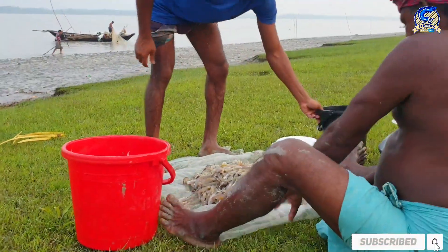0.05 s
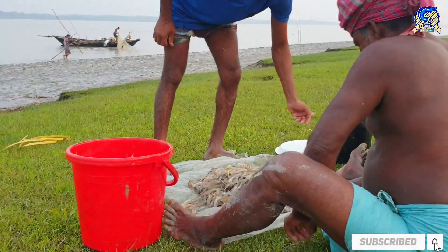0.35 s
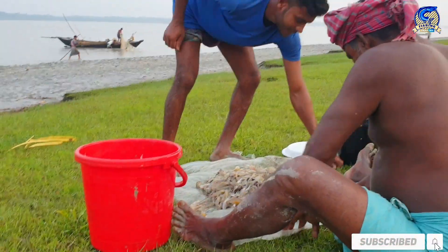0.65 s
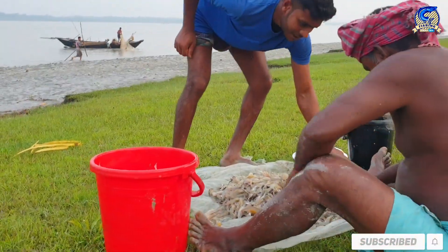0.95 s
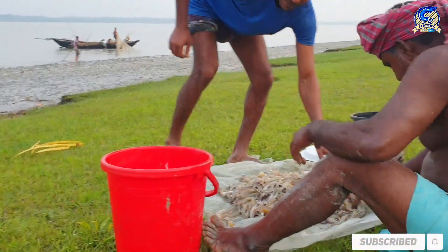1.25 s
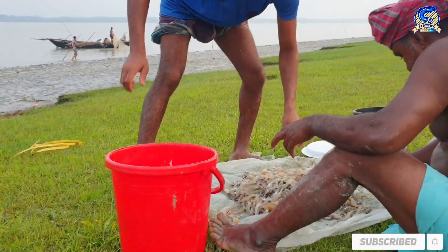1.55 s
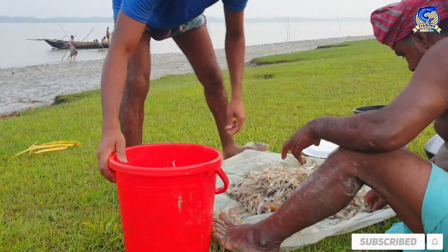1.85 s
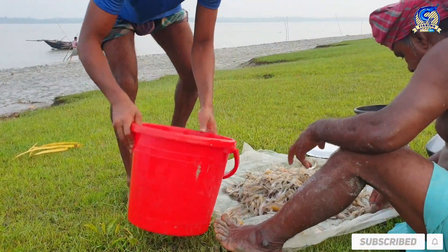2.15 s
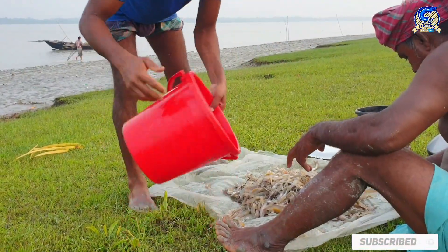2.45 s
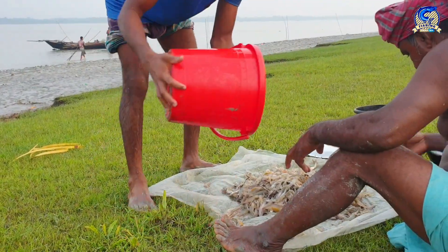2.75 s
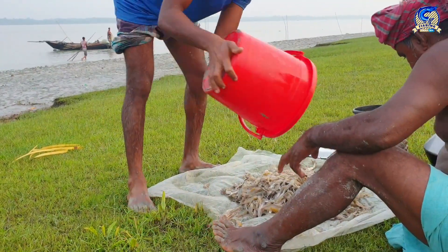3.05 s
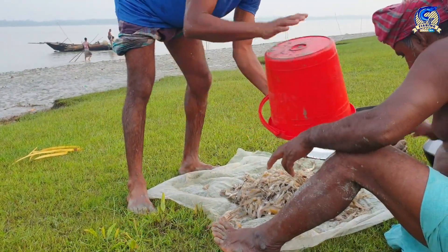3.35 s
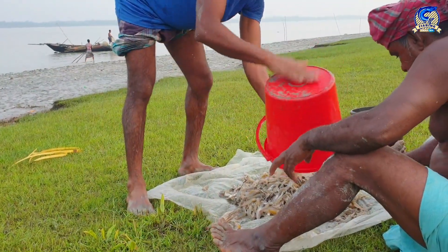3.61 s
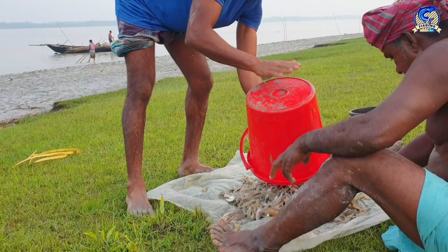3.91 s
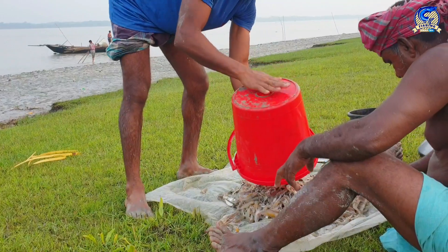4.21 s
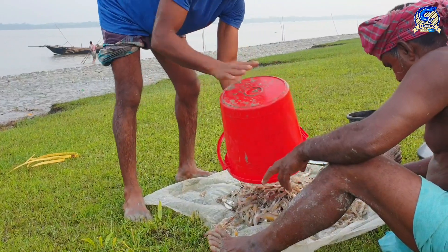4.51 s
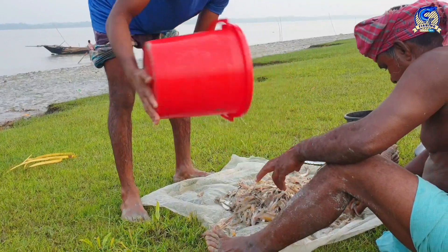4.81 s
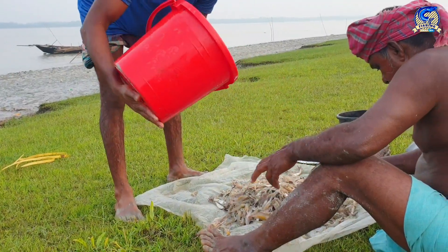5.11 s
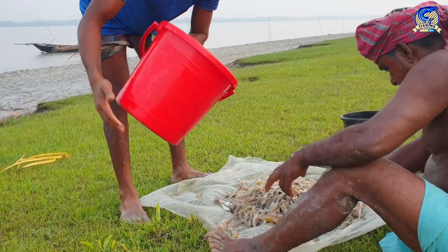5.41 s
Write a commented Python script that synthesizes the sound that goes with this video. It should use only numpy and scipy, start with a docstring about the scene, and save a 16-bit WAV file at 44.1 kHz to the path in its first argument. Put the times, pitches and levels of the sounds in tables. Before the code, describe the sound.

Outdoors, over light wind rumble and a thin hiss, fingers scrape, tap and bump the microphone, mostly on the right. A plastic bucket then knocks softly as it is turned over. A hand slaps its bottom six times in quick succession, each slap a hollow boom with a rattle of the loose handle. A few light knocks follow as the grip shifts.

```python
"""On a grassy riverbank, over light gusts of wind and a thin hiss, fingers rub, tap and bump the camera
near its right microphone. Then a plastic bucket is lifted and turned over, knocking in the hands.
It is slapped six times on its bottom to empty it: each slap booms in the hollow, rings the walls
and makes the loose handle chatter. A few light knocks follow as the grip shifts."""
import sys
import numpy as np
from scipy import signal
from scipy.io import wavfile
from scipy.ndimage import uniform_filter1d

SR = 44100
rng = np.random.default_rng(int(sys.argv[2]) if len(sys.argv) > 2 else 0)


def int16_out(signal):
    """Quantize to a 16-bit WAV file."""
    q = np.round(np.clip(np.atleast_2d(signal).T, -1, 1) * 32767)
    wavfile.write(sys.argv[1], SR, q.astype(np.int16))


N = 249859
TIME_S = np.arange(N) / SR
AGE_S = np.arange(SR // 2) / SR  # since a blow


def amp(db):
    """Decibels to gain."""
    return 10 ** (np.asarray(db) / 20)


def unit(x):
    """Scales to rms 1."""
    return x / np.sqrt(np.mean(x ** 2) + 1e-20)


def add(mix, start_s, sound):
    """Mixes a sound in at start_s."""
    part = mix[:, max(round(start_s * SR), 0):][:, :sound.shape[-1]]
    part += sound[..., :part.shape[1]]


def pan(side_db):
    """Stereo gains of mean 1; positive is left."""
    gains = amp([[side_db / 2], [-side_db / 2]])
    return gains / gains.mean()


def colour(x, spectrum, size=2048):
    """Minimum-phase filter of unit energy."""
    hz, db = np.transpose(spectrum)
    bin_hz = abs(np.fft.fftfreq(size, 1 / SR))
    log_gain = np.log(amp(np.interp(np.log(bin_hz + 1), np.log(hz + 1), db)))
    taps = np.fft.ifft(np.exp(np.conj(signal.hilbert(log_gain)))).real[:size // 2]
    return signal.fftconvolve(x, taps[None] / np.linalg.norm(taps), axes=1)[:, :x.shape[1]]


def noise(count, alike):
    """Stereo white noise with correlation alike."""
    shared, *own = rng.standard_normal((3, count))
    return np.sqrt(alike) * shared + np.sqrt(1 - alike) * np.array(own)


def uneven(x, patchy_db, size=512):
    """Patches some 500 Hz wide and 40 ms long swell and sink."""
    bins = signal.stft(x, nperseg=size)[2]
    patches = uniform_filter1d(rng.standard_normal(bins.shape[1:]), size=6, axis=0)
    patches = unit(uniform_filter1d(patches, size=7, axis=1))
    return unit(signal.istft(bins * amp(patchy_db * patches), nperseg=size)[1][:, :N])


def level(curve):
    """Gain along a dB curve."""
    return amp(np.interp(TIME_S, *np.transpose(curve)))


def stroke(peak_s, level_db, rise_s, hold_s, fall_s, depth_db=20.5, curve=1.52):
    """Gain that swells until peak_s, holds and lets go."""
    t = TIME_S - peak_s
    away = np.clip(np.maximum(-t / rise_s, (t - hold_s) / fall_s), 0, 10)
    return amp(level_db - depth_db * away ** curve)


def strokes(rows):
    """Summed gain of several strokes."""
    return sum(stroke(*row) for row in rows)


def fade(t60_s):
    """Exponential decay after a blow."""
    return np.exp(-np.log(1000) * AGE_S / t60_s)


def burst(t60_s, alike):
    """Decaying noise of one contact."""
    return noise(len(AGE_S), alike) * fade(t60_s)


def mode(hz, t60_s, rise_s):
    """A resonance set going by a soft blow."""
    return np.sin(2 * np.pi * hz * AGE_S) * fade(t60_s) * (1 - np.exp(-AGE_S / rise_s))


def friction(spectrum, slips_per_s, alike, smooth):
    """Tiny slips of uneven size over a smooth rub."""
    slips = (rng.random(N) < slips_per_s / SR) * rng.standard_normal(N)
    return unit(colour(unit(slips) + smooth * noise(N, alike), spectrum))


def chatter(hits_per_s, smooth, decay_s=0.0017):
    """Irregular impacts of loose parts over smooth noise."""
    impacts = (rng.random(len(AGE_S)) < hits_per_s / SR) * rng.uniform(0.9, 1, len(AGE_S))
    envelope = unit(signal.lfilter([1], [1, -np.exp(-1 / (decay_s * SR))], impacts))
    return noise(len(AGE_S), 0.54) * (envelope + smooth) / np.hypot(1, smooth)


# hiss spectrum: freq_hz, density_db
HISS_SPECTRUM = [(2180, -28), (3700, -13), (5380, -0.5), (6150, 0.5), (6660, -3.5), (7580, -5), (8310, -12),
                 (9220, -5.5), (10600, -12), (12100, -8), (13900, -24), (15000, -24), (16000, -25.5)]
# hiss envelope: time_s, level_db
HISS_CURVE = [(0.4, -65), (0.49, -61.5), (1.07, -59), (1.64, -63.5), (2.07, -62), (2.23, -63.5),
              (3.55, -66.5), (3.86, -71), (4.3, -65), (4.62, -75), (5.18, -72), (5.67, -71.5)]
def hiss(gain_db=3, crackle_db=-8):
    """Thin, high hiss with faint crackles."""
    steady = unit(colour(noise(N, 0.15), HISS_SPECTRUM))
    crackle = amp(crackle_db) * friction(HISS_SPECTRUM, slips_per_s=41, alike=0.3, smooth=0.1)
    return amp(gain_db) * uneven(steady + crackle, patchy_db=1.2) * level(HISS_CURVE) * pan(-5.5)


# rustle spectrum: freq_hz, density_db
RUSTLE_SPECTRUM = [(150, -3.5), (260, 0), (500, -7), (850, -7.5), (1150, -8.5), (1800, -15.5),
                   (2600, -17.5), (3400, -23.5), (6000, -46.5)]
# rustle envelope: time_s, level_db
RUSTLE_CURVE = [(0.0, -54), (0.16, -55), (0.61, -50.5), (0.76, -55), (1.23, -54), (1.5, -62), (1.96, -59.5),
                (2.22, -64), (2.9, -57), (3.38, -63.5), (3.68, -57.5), (4.42, -60.5), (4.81, -68),
                (5.67, -76.5)]
def rustle(gain_db=0.5):
    """Fine friction of handled things."""
    rub = friction(RUSTLE_SPECTRUM, slips_per_s=130, alike=0.31, smooth=1.4)
    return amp(gain_db) * uneven(rub, patchy_db=2.5) * level(RUSTLE_CURVE) * pan(-0.25)


# wind spectrum: freq_hz, density_db
WIND_SPECTRUM = [(12, -47), (20, -16), (48, 5), (70, 5.5), (124, -2.5), (172, -12.5), (259, -23),
                 (300, -32), (390, -42.5), (660, -120)]
# steady wind: time_s, level_db
WIND_CURVE = [(0.0, -50), (0.66, -45.5), (1.56, -53), (1.83, -48.5), (2.27, -63), (3.19, -46.5),
              (3.98, -49), (4.31, -51), (5.21, -59), (5.67, -63.5)]
# gusts: peak_s, level_db, rise_s, hold_s, fall_s
WIND_GUSTS = [(2.382, -45.5, .06, 0.03, 0.085), (3.07, -49, .15, 0.047, 0.12),
              (4.525, -44, .05, 0.086, 0.07)]
def wind(gain_db=3.5):
    """Wind rumbles on the microphone ports."""
    rumble = unit(colour(noise(N, 0.44), WIND_SPECTRUM, size=16384))
    return amp(gain_db) * rumble * (level(WIND_CURVE) + strokes(WIND_GUSTS)) * pan(-2.3)


# creak envelope: peak_s, level_db, rise_s, hold_s, fall_s
CREAK_STROKE = (.052, -39, .016, .02, .022)
def creak(pitch_hz=324.5, sag_hz_per_s=450, overtone_db=-7, overtone_ratio=1.86, rough=0.4):
    """A faint, rough two-tone creak that sags in pitch."""
    hz = np.maximum(pitch_hz - sag_hz_per_s * (TIME_S - CREAK_STROKE[0]), 0)
    phase = 2 * np.pi * np.cumsum(hz) / SR
    tone = np.sin(phase) + amp(overtone_db) * np.sin(overtone_ratio * phase)
    flutter = 1 + rough * unit(uniform_filter1d(rng.standard_normal(N), 120))
    return stroke(*CREAK_STROKE) * flutter * tone * pan(-1)


# skin rub spectra: freq_hz, density_db
GLIDE_SPECTRUM = [(88, -29), (150, -4.5), (190, -7.5), (578, -1.5), (649, -2.5), (745, -8.5), (1190, -7),
                  (1420, -1), (6020, -4.5), (8230, -12), (11500, -1), (16000, -18)]
BRUSH_SPECTRUM = [(240, -30), (400, -31), (626, -10), (801, -5), (879, -19), (994, -5.5), (3690, -9),
                  (6150, 1), (8370, -15), (11900, -6), (16000, -27)]
# skin strokes: peak_s, level_db, rise_s, hold_s, fall_s
GLIDE_STROKES = [(.01, -54.5, .05, 0.051, .1), (0.209, -36, 0.069, 0.029, 0.11),
                 (0.52, -53, 0.25, 0.61, 0.35), (1.315, -46.5, 0.037, 0.0074, .035)]
BRUSH_STROKES = [(1.865, -41, 0.011, 0.0033, 0.02), (1.9, -50, 0.031, 0.1, 0.25)]
def case_rubs():
    """Skin glides over the camera case, then brushes lightly past."""
    glide = uneven(friction(GLIDE_SPECTRUM, slips_per_s=2700, alike=0.11, smooth=2.9), patchy_db=3)
    brush = uneven(friction(BRUSH_SPECTRUM, slips_per_s=440, alike=0.13, smooth=1.8), patchy_db=3)
    return strokes(GLIDE_STROKES) * glide * pan(-0.68) + strokes(BRUSH_STROKES) * brush * pan(-3)


# firm and light scrape spectra: freq_hz, density_db
SCRAPE_SPECTRA = [
    [(47, -33), (80, 10), (178, -12.5), (296, -2.5), (441, -18), (538, 1.5), (858, -12.5), (980, -20.5),
     (1070, -10.5), (3030, -23.5), (6030, -20), (8050, -30.5), (12800, -17.5), (15000, -26), (16000, -53)],
    [(47, -13.5), (80, -4.5), (194, -7.5), (323, -23), (702, -8), (1170, -15), (1560, -13.5), (2900, -27),
     (6030, -19), (8410, -33.5), (11700, -21), (14000, -26.5), (16000, -51)],
]
# scrapes: peak_s, level_db, rise_s, hold_s, fall_s, firmness, judder_db
SCRAPE_STROKES = [(0.6, -24.5, 0.039, 0.015, 0.029, 0.97, -4.5),
                  (1.13, -34, 0.035, 0.033, 0.046, 0.15, -0.5)]
def port_scrapes(judder_hz=330, judder_t60_s=0.0087, jerks_per_s=180):
    """Skin scrapes and judders across the right port."""
    firm, light = (uneven(friction(spectrum, slips_per_s=2500, alike=0.47, smooth=1), patchy_db=2)
                   for spectrum in SCRAPE_SPECTRA)
    jerks = (rng.random(N) < jerks_per_s / SR) * rng.choice([-1, 1], N)
    judder = unit(signal.oaconvolve(jerks, mode(judder_hz, judder_t60_s, 0.00032))[:N])
    out = np.zeros((2, N))
    for *shape, firmness, judder_db in SCRAPE_STROKES:
        out += stroke(*shape) * (firmness * firm + (1 - firmness) * light + amp(judder_db) * judder)
    return out * pan(-31)


# tick spectrum: freq_hz, density_db
TICK_SPECTRUM = [(100, 1), (500, -0.5), (1200, 1), (2400, -2), (3800, -11.5), (6000, -3.5), (8300, -34.5),
                 (12000, -5), (16000, -27.5)]
# skin ticks: start_s, level_db
SKIN_TICKS = [(0.404, -31.5), (.451, -17), (0.4781, -24.5), (.517, -21), (0.522, -22.5), (.558, -19.5),
              (0.5889, -15.5), (0.594, -21)]
def skin_ticks(t60_s=0.0053):
    """Skin sticks and lets go at the right port."""
    out = np.zeros((2, N))
    for start_s, level_db in SKIN_TICKS:
        add(out, start_s, amp(level_db) * pan(-28) * colour(burst(t60_s, alike=0.61), TICK_SPECTRUM))
    return out


# tap body and edge spectra: freq_hz, density_db
TAP_SPECTRUM = [(150, -19.5), (600, -3.5), (1300, 0.5), (2000, -7.5), (3300, -1), (8000, -18), (16000, -29)]
EDGE_SPECTRUM = [(1000, -33), (3500, 5.5), (5200, 6), (6500, 1), (8300, -11), (12000, -4), (16000, -22)]
# nail taps: start_s, level_db, t60_s, side_db
NAIL_TAPS = [(1.239, -26.5, 0.018, -6), (1.412, -27, 0.051, -0.5), (1.647, -45, .012, -7)]
def nail_taps(edge_db=-4):
    """A fingernail taps the case; the bright edge sits to the right."""
    out = np.zeros((2, N))
    for start_s, level_db, t60_s, side_db in NAIL_TAPS:
        blow = burst(t60_s, alike=0.39)
        body = pan(side_db) * colour(blow, TAP_SPECTRUM)
        edge = amp(edge_db) * pan(-14) * colour(blow, EDGE_SPECTRUM)
        add(out, start_s, amp(level_db) * (body + edge))
    return out


# case and click spectra: freq_hz, density_db
CASE_SPECTRUM = [(40, -21.5), (170, 4), (270, 1), (500, -8), (720, -3), (880, 0.5), (1150, -11.5),
                 (1900, -23.5), (2300, -24.5), (2850, -17), (3500, -26.5), (16000, -39.5)]
CLICK_SPECTRUM = [(500, -29.5), (3800, -21), (4800, 6.5), (5700, -4), (6700, 0), (7700, -6.5), (9500, -5),
                  (12500, -1), (16000, -12)]
# finger bumps: start_s, level_db, t60_s, side_db, click_db
FINGER_BUMPS = [(0.121, -40, 0.012, -1, -62), (0.177, -32.5, 0.009, -26, -58), (.408, -38, 0.017, -25, -52),
                (0.693, -17.5, 0.045, -1.5, -38), (0.7107, -13, 0.035, -1, -16.5),
                (0.9166, -29, 0.068, -2, -21), (1.686, -33.5, 0.014, -21, -42.5),
                (1.79, -48, 0.017, -9, -67)]
def finger_bumps(push=11, grit=0.78, ring_db=-31, click_t60_s=0.017):
    """Fingers bump the case, which thuds, clicks and rings faintly."""
    out = np.zeros((2, N))
    ring = amp(ring_db) * (mode(838, 0.25, 0.001) + mode(946, 0.1, 0.001))
    for start_s, level_db, t60_s, side_db, click_db in FINGER_BUMPS:
        blow = grit * burst(t60_s, alike=0.43) - push * (AGE_S == 0)
        thud = amp(level_db) * (colour(blow, CASE_SPECTRUM) + ring)
        click = amp(click_db) * colour(burst(click_t60_s, alike=0.5), CLICK_SPECTRUM)
        add(out, start_s, pan(side_db) * (thud + click))
    return out


# slide spectrum: freq_hz, density_db
SLIDE_SPECTRUM = [(400, -7), (900, -2), (1500, 5), (2100, -9), (2900, 6), (3600, -11), (6000, 1),
                  (12000, -19.5)]
# palm slides: peak_s, level_db, rise_s, hold_s, fall_s
SLIDE_STROKES = [(2.486, -60.5, .04, 0.1, 0.29), (3.36, -50.5, .015, .005, 0.047)]
def palm_slides():
    """Palms slide on the bucket as it turns."""
    return strokes(SLIDE_STROKES) * friction(SLIDE_SPECTRUM, slips_per_s=650, alike=0.73, smooth=1)


# bucket wall modes: pitch_hz, level_db, t60_s
WALL_MODES = [(91.6, -3, 0.41), (229.7, 2.5, 0.21), (302, -4.5, 0.29), (369, 0, 0.13), (480, 1, 0.053),
              (569, -11.5, 0.1), (684, -6, .06), (783, 7, .05), (839, -3, 0.16), (1096, -8, 0.1),
              (1110, -32.5, .1), (1310, -11, 0.11), (1545, -20.5, 0.13), (1590, -18, 0.057),
              (2010, -25, 0.063), (1950, -22.5, 0.055), (2800, -33, .06)]
def wall_ring(spread_db=6, grip_bend=0.007):
    """The wall rings, struck at a different spot and bent by the grip each time."""
    out = np.zeros((2, len(AGE_S)))
    for pitch_hz, level_db, t60_s in WALL_MODES:
        spot_db = spread_db * np.tanh(rng.standard_normal((2, 1)))
        bend = 1 + grip_bend * rng.standard_normal()
        out += amp(level_db + spot_db) * mode(pitch_hz * bend, t60_s, 0.0011)
    return out


# plastic clack spectrum: freq_hz, density_db
CLACK_SPECTRUM = [(100, 2.5), (350, -10.5), (620, 7.5), (880, 3.5), (1400, -1.5), (2300, -10),
                  (3600, -22.5), (5500, -11.5), (8300, -22), (12000, -35.5), (16000, -45)]
# grip knocks: start_s, clack_db, boom_db, ring_db
GRIP_KNOCKS = [(2.586, -48, -67, -55.5), (2.746, -42.5, -30, -48.5), (2.973, -56, -62, -52.5),
               (3.056, -50.5, -57, -58), (3.091, -52.5, -51, -52), (3.156, -56, -39.5, -67),
               (3.31, -39, -39, -61), (3.35, -48, -37.5, -55.5), (4.757, -45.5, -28, -44.5),
               (4.787, -56, -40, -55), (4.8245, -43, -51, -57), (5.091, -33.5, -53.5, -52),
               (5.1068, -35.5, -54, -54), (5.22, -55, -72, -66), (5.277, -60, -66, -63.5)]
def grip_knocks(clack_t60_s=0.089, hollow_hz=260, hollow_t60_s=0.12, detune=0.025):
    """Shifting hands clack on the bucket and wake its wall and hollow."""
    out = np.zeros((2, N))
    for start_s, clack_db, boom_db, ring_db in GRIP_KNOCKS:
        contact = chatter(400, smooth=0.12) * fade(clack_t60_s) + 0.87 * burst(0.0052, alike=0.78)
        clack = amp(clack_db) * colour(contact, CLACK_SPECTRUM)
        boom = mode(hollow_hz * (1 + detune * rng.uniform(-1.2, 1)), hollow_t60_s, 0.00096)
        add(out, start_s, clack + amp(ring_db) * wall_ring() + amp(boom_db) * boom)
    return out


# handle spectrum: freq_hz, density_db
HANDLE_SPECTRUM = [(100, -21.5), (500, 1.5), (850, 0), (1350, 4), (2200, -4), (2900, -7.5), (3700, -15),
                   (5500, -9), (8300, -24), (12000, -26.5), (16000, -33.5)]
def handle_bounces(gap_s=0.019, gap_ratio=0.69, step_db=-5, wall_db=-15, hollow_db=-9):
    """The handle hits the rim three times, ever sooner and weaker, faintly waking wall and hollow."""
    out = np.zeros((2, SR))
    hollow = amp(hollow_db) * mode(hz=255, t60_s=0.1, rise_s=0.002)
    at_s = 0
    for bounce in range(3):
        contact = chatter(818, smooth=0.88) * fade(0.027) + 0.3 * burst(0.0073, alike=0.75)
        hit = colour(contact, HANDLE_SPECTRUM) + amp(wall_db) * wall_ring() + hollow
        add(out, at_s, amp(bounce * step_db) * hit)
        at_s += gap_s * gap_ratio ** bounce * (1 + 0.15 * rng.uniform(-1.1, 1))
    return out


# smack spectrum: freq_hz, density_db
SMACK_SPECTRUM = [(100, 9.5), (400, 11), (600, -3), (850, -2.5), (1400, -6.5), (2500, -5.5), (3600, -16),
                  (5200, -3), (6800, -6), (8300, -20), (12000, -19), (16000, -32)]
def skin_smack(level_db, usual_db=-23, usual_t60_s=0.047, halving_db=10.5):
    """Skin smacks plastic; the harder, the shorter."""
    t60_s = usual_t60_s * 0.5 ** ((level_db - usual_db) / halving_db)
    contact = noise(len(AGE_S), 0.45) * (fade(t60_s) + 0.5 * fade(0.003))
    return amp(level_db) * colour(contact, SMACK_SPECTRUM)


# slaps: start_s, smack_db, finger_db, palm_lag_s, palm_db, boom_db, boom_hz, rock_db, shake_db, flight_s
BUCKET_SLAPS = [(3.5249, -22, -5.5, 0.0043, 5, -2.5, 274.3, -46, -29.5, 0.11),
                (3.745, -14, 3.5, .0066, -1.5, 3, 258.8, -31, -37.5, .093),
                (3.9294, -24.5, -22.5, 0.0014, 2, 0, 251, -26, -32, 0.13),
                (4.1226, -27.5, -26, .0015, 1, -11, 250, -38, -35.5, .097),
                (4.298, -30.5, -7, .0013, 0, -8, 250, -8.5, -33.5, .111),
                (4.4752, -20, -1, 0.0041, -14, 1.5, 254.2, -29, -32, 0.11)]
def bucket_slaps(dent_s=0.0024, wall_db=2, kick_s=0.029, kick_db=-6, landing_db=-39.5, cut_hz=60):
    """Fingers, then palm, dent the bottom; the hollow booms, the wall rings, the handle is thrown."""
    body, handle = np.zeros((2, 2, N))
    dent = -0.14 * np.sin(np.pi * np.minimum(AGE_S / dent_s, 1))
    thump = mode(hz=188, t60_s=0.022, rise_s=0.0021)
    rock = mode(hz=385, t60_s=0.045, rise_s=0.0031)  # an off-centre blow rocks the bottom
    for (start_s, smack_db, finger_db, palm_lag_s, palm_db,
         boom_db, boom_hz, rock_db, shake_db, flight_s) in BUCKET_SLAPS:
        palm_s = start_s + palm_lag_s
        add(body, start_s - 0.0012, skin_smack(smack_db) * pan(-3.5))
        for at_s, level_db in (start_s, finger_db), (palm_s, palm_db):
            add(body, at_s - dent_s, amp(level_db) * dent * pan(-1.4))
            add(body, at_s, amp(level_db) * thump * pan(-1.5))
        boom = amp(boom_db) * mode(boom_hz, t60_s=0.076, rise_s=0.0023) + amp(rock_db) * rock
        buzz = colour(chatter(220, smooth=0.5) * fade(0.13), HANDLE_SPECTRUM)
        shake = amp(shake_db) * (amp(wall_db) * wall_ring() + buzz)
        add(body, palm_s, boom * pan(-2.2) + shake)
        add(handle, palm_s + kick_s, amp(shake_db + kick_db) * handle_bounces())
        add(handle, palm_s + flight_s, amp(landing_db) * handle_bounces())
    low_cut = signal.butter(2, cut_hz, "high", fs=SR, output="sos")  # a small body radiates little bass
    return signal.sosfilt(low_cut, body) + handle


def ports(x, hz=6000, q=1.6, left_db=-5, right_db=1.5):
    """Airborne sound has more upper treble in the right port than in the left."""
    treble = signal.lfilter(*signal.iirpeak(hz, q, SR), x)
    return x + (amp([[left_db], [right_db]]) - 1) * treble


def scene():
    """Open air, no reverberation; touches come straight through the case."""
    airborne = hiss() + rustle() + wind() + creak() + palm_slides() + grip_knocks() + bucket_slaps()
    touches = case_rubs() + port_scrapes() + skin_ticks() + nail_taps() + finger_bumps()
    return ports(airborne) + touches


def record(dry):
    """Full-scale clip, then a 16 kHz low-pass."""
    low_pass = signal.firwin(301, 16000, window=("kaiser", 8), fs=SR)
    return signal.oaconvolve(np.clip(dry, -1, 1), low_pass[None], "same")


dry = scene()
out = record(dry)
int16_out(out)
```